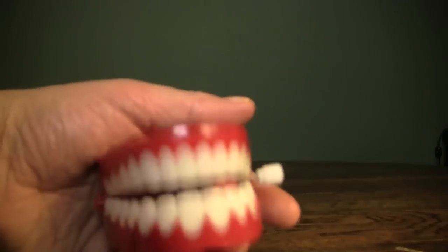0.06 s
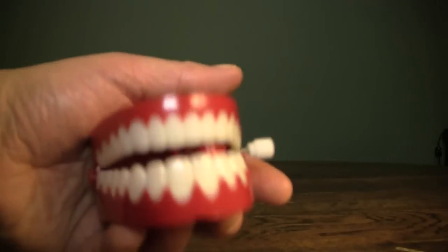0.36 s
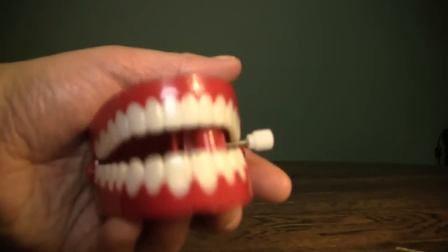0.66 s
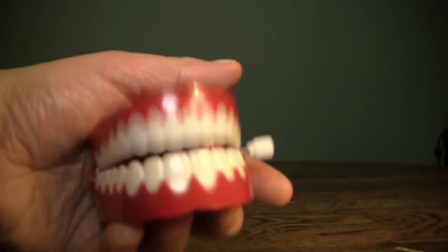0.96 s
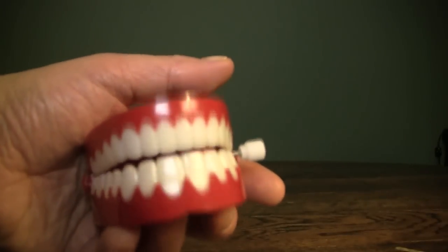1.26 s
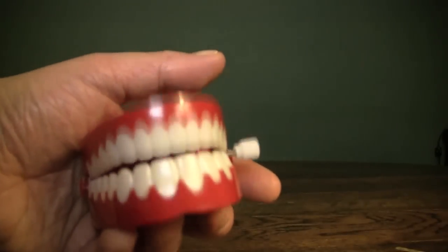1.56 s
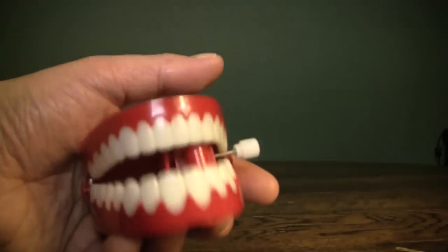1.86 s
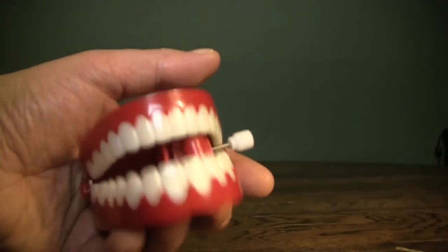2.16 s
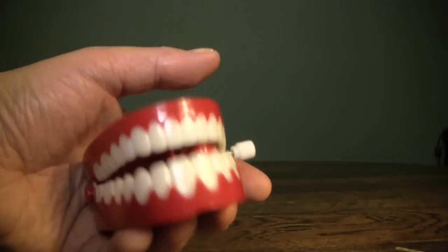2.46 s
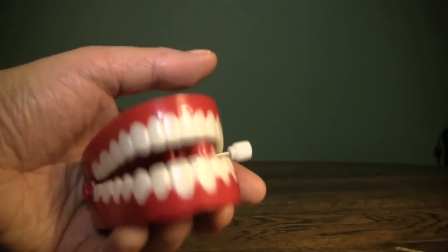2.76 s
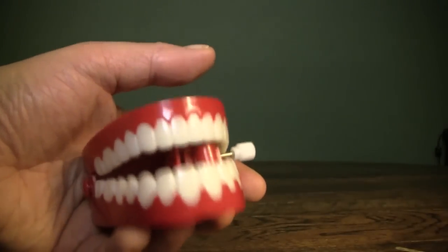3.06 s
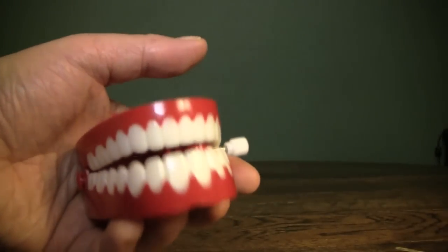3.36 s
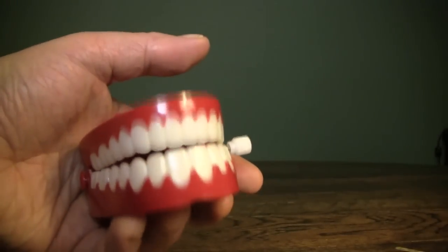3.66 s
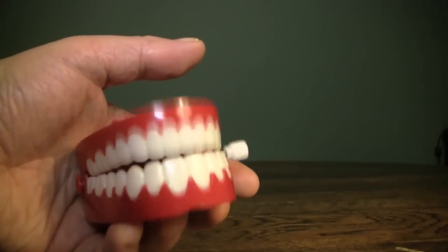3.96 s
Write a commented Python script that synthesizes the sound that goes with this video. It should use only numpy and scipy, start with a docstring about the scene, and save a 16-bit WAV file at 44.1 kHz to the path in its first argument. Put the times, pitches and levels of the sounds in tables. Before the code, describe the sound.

A wind-up teeth toy clicks and clacks rapidly in a hand, heard up close in a quiet room. Soft thuds under the bites fade midway, and the chatter slows as the spring runs down to a final clack.

```python
"""Wind-up plastic teeth chatter in a hand, close by in a quiet room.
From the start, about 21 times a second, a cam clicks the jaw open and the jaw clacks shut.
A finger resting on the upper jaw adds a thud and changes its ring; near 2 s it lifts.
After 3 s the spring runs down: the bites slow, and one late last bite falls at 3.9 s."""
import sys
import numpy as np
from scipy import signal
from scipy.fft import rfft, irfft
from scipy.io import wavfile
from scipy.ndimage import uniform_filter1d

SR = 44100
rng = np.random.default_rng(int(sys.argv[2]) if len(sys.argv) > 2 else 0)


def wav_record(signal):
    """Record a signal, one row per channel, as 16-bit PCM in the file named by sys.argv[1]."""
    frames = np.transpose(np.atleast_2d(signal))
    bounded = np.clip(frames, -1, 1)
    # unit amplitude maps onto the largest positive 16-bit level
    quanta = np.round(bounded * 32767).astype(np.int16)
    wavfile.write(sys.argv[1], SR, quanta)


N = 176400

# Room tone spectrum: (frequency [Hz], relative density [dB])
ROOM_TONE = [(20, -13), (60, -10.5), (170, -4), (400, -6), (1000, -10), (4000, -13), (10000, -18.5),
             (16000, -38)]
# Room tail decay: (frequency [Hz], t60 [s])
ROOM_T60 = [(200, 1.5), (1500, 0.5764), (4000, 0.3248), (8000, 0.48), (15000, 0.3)]
# Reflection spectrum: (frequency [Hz], level [dB])
ROOM_COLOUR = [(100, -15.5), (400, -20), (1000, -14), (1500, -13.8), (2200, -9.8), (3000, -11.3),
               (4000, -13.2), (8000, -15), (15000, -19.5)]
# Bites: (open time [s], click level [dB], shut time [s], clack level [dB], thud level [dB])
BITES = [(0.0159, -0.4, 0.0337, 0.16, -5), (0.0588, -0.06, 0.0768, 0.15, -3),
         (0.1032, -0.03, 0.1214, -0.6, -7.5), (0.1517, 1.65, 0.1698, 0.5, -4.5),
         (0.1992, 0.7, 0.2174, 0.4, -3), (0.2448, 0.5, 0.2631, 0.26, -2.5), (0.2907, 1.5, 0.3088, 0.4, -1),
         (0.3352, 1.8, 0.354, 0.45, -1), (0.3819, 0.62, 0.401, 1, -4.5), (0.4284, 0.1, 0.4473, -0.55, -4),
         (0.4754, 1, 0.4936, -0.0, -3.5), (0.5205, -0.5, 0.5394, 0.4, -2.5), (0.5673, 0.5, 0.5861, 0.5, -7),
         (0.617, -0.52, 0.636, 0.1, -8.5), (0.6654, -0.6, 0.6839, 0.91, -5.5),
         (0.712, -0.28, 0.7304, 0.3, -1), (0.7585, -1.4, 0.7773, 0.1, -2), (0.8073, 0, 0.8262, -1, -4),
         (0.8556, -0.62, 0.8745, -0.9, -8.5), (0.9029, -0.15, 0.9216, 0.85, -5),
         (0.9492, 0, 0.9675, 0.54, -4), (0.997, 0.58, 1.0165, -0.5, -2), (1.047, 0.12, 1.0657, 0.0, -3),
         (1.0955, -0.17, 1.1134, 1.0, -2.5), (1.1428, -1.35, 1.1615, 0.66, -4.5),
         (1.1895, -0.66, 1.2084, 0.5, -1.5), (1.2426, -1.43, 1.2618, -0.86, -0.5),
         (1.2924, -1.5, 1.3116, -1.5, 1), (1.3422, -0.13, 1.3605, -0.0, -2.5),
         (1.3894, -1, 1.4089, -2.5, -8.5), (1.4403, 0.17, 1.4601, -0.93, -3),
         (1.4932, -1, 1.5127, -0.6, -1), (1.5446, -1.5, 1.5641, 0.05, -4),
         (1.5939, -0.5, 1.6136, -0.13, -0.5), (1.6442, -1, 1.6638, -0.2, 1.5),
         (1.6972, -1.23, 1.7172, -1.13, -3.5), (1.7511, -1, 1.7703, -0.48, -1.5),
         (1.8028, -1.67, 1.8223, 0, -0.5), (1.8517, -0.83, 1.8723, -1.34, -6),
         (1.906, -1.37, 1.9261, -0.79, -11), (1.9605, -0.5, 1.9805, -0.85, -18),
         (2.0132, -0.07, 2.0332, -1.0, -15), (2.0635, 0.68, 2.0835, -0.54, -8),
         (2.1126, -0.43, 2.1326, -0.5, -8), (2.1633, 0.25, 2.1838, -0.83, -6),
         (2.2126, 1.3, 2.233, -1.1, -8), (2.2596, 2.8, 2.2799, -1.13, -11),
         (2.3048, 2.48, 2.3249, 0.07, -12.5), (2.3516, 2, 2.3721, -0.13, -17),
         (2.3989, 1, 2.4192, 0.5, -11), (2.445, 2.32, 2.4648, -0.24, -8.5),
         (2.4889, -0.27, 2.5091, 0.5, -12.5), (2.532, 0.1, 2.5528, -0.08, -14.5),
         (2.579, 0, 2.6001, -0.6, -17.5), (2.6257, 0.2, 2.6466, 0.5, -18),
         (2.6705, 0.0, 2.6908, 0.42, -14.5), (2.7143, -0.53, 2.7353, -0.19, -15),
         (2.7606, 0.32, 2.7819, -0.5, -16.5), (2.8094, 0.74, 2.8305, 0.1, -19),
         (2.8566, -0.5, 2.8777, 0.5, -17.5), (2.9043, 0.76, 2.9252, 1, -14),
         (2.9523, 1.68, 2.9736, 0.5, -15), (3.0049, 1.9, 3.0265, -0.43, -18),
         (3.0571, 1.52, 3.0779, -0.0, -12.5), (3.1093, 1.08, 3.1303, 0.76, -17.5),
         (3.1602, 1.66, 3.1814, -0.95, -16), (3.2147, 2.94, 3.2364, -0.6, -17),
         (3.272, 2.35, 3.2941, -0.68, -15), (3.3272, 0.5, 3.3487, 1, -16), (3.3795, 1, 3.4009, 1.17, -16),
         (3.4324, 0.47, 3.4543, 0.78, -16.5), (3.489, 1.8, 3.5113, 0.17, -17),
         (3.5502, 1.24, 3.5723, 1, -17), (3.613, 2.2, 3.6344, 1.59, -14.5),
         (3.6709, 1.5, 3.6927, 1.36, -17.5), (3.7405, 1.6, 3.7651, -1.5, -19.5),
         (3.9086, 4, 3.9308, 0.79, -21)]
# Clockwork resonances: (frequency [Hz], width [Hz], height [dB])
CAM_MODES = [(1291, 144, 7.5), (1475, 226, 11.5), (2241.6, 121, 9), (3120, 154, 4.5), (3684, 728, 17),
             (4552, 344, 13), (5835, 610, 9), (7380, 360, 3), (9175, 360, 6.5), (10627, 1938, 13.5),
             (11540, 766, 12.5), (13950, 2680, 18.5)]
# Broad click spectrum: (frequency [Hz], level [dB])
CAM_COLOUR = [(30, -28.5), (100, -26), (250, -15), (600, -1), (1000, -3.5), (2550, -0.5), (5200, -4),
              (8500, -2.5), (12500, -13.5), (15500, -16.5)]
# Jaw resonances: (held frequency [Hz], free frequency [Hz], width [Hz], held height [dB],
# free height [dB])
JAW_MODES = [(1299, 1259, 213.2, 4.5, 12), (1509.5, 1526.5, 242.5, 15.5, 18),
             (1766, 1758.7, 274.5, 13, 15.5), (2123, 2191, 329.3, 13.5, 16), (2796, 2911, 397.6, 21, 15.5),
             (3136, 3350, 513, 6, 10.5), (3644.4, 3680, 330, 19, 8), (4384, 4313, 485, 10, 12),
             (5982, 6205, 292, 8.5, 8.5), (6810, 7016, 446, 3.5, 5), (7844, 7950, 1130, 7, 6.5),
             (9843, 9738, 738, 7.5, 8.5), (10900, 11320, 1840, 6.5, 8)]
# Broad clack spectrum: (frequency [Hz], level [dB])
JAW_COLOUR = [(30, -25), (80, -20), (140, -11.5), (250, -4.5), (400, 1), (700, 5), (900, 3), (1100, 5),
              (2550, -5.5), (5200, 6.5), (8500, 2.5), (12500, -2), (15500, -6)]
# Finger on the jaw: (time [s], lift [0 held, 1 free])
FINGER_LIFT = [(0, 0.393), (.4, 0.11), (1.2, 0), (1.8, 0.117), (2.05, 0.753), (2.4, 0.84), (3.0, 1),
               (4, 0.62)]
# Grip detuning of the low jaw modes: (time [s], frequency factor [ratio])
GRIP_DETUNE = [(0, 0.9902), (1.8, 1.0133), (2.08, 0.975), (2.3, 1.047), (2.7, 0.993), (3.1, 0.9934),
               (3.65, 0.971), (3.93, 0.933)]
# Diffuse sound at the microphone pair: (frequency [Hz], coherence [0..1])
MIC_COHERENCE = [(30, .45), (250, .6), (600, .75), (1500, 0.9964), (3500, 0.9626), (7000, 0.855),
                 (12000, 0.163)]
# Port imbalance: (frequency [Hz], left minus right [dB])
MIC_BALANCE = [(60, 2.5), (200, -4), (600, -1.59), (1500, 0), (6400, -0.08), (9800, -1.5), (12000, 0),
               (15000, 3.5)]
# Port phase: (frequency [Hz], left lead [rad])
MIC_PHASE = [(30, 0.33), (340, 0.173), (2500, 0), (6000, 0), (9300, 0.044), (10400, 0.74), (12100, 1.14),
             (14000, 0.71), (16000, 0.65)]

CAM_BURST = dict(crack_t60_s=.013, rattle_db=-12, rattle_t60_s=.02)
JAW_BURST = dict(crack_t60_s=.0154, rattle_db=-10.5, rattle_t60_s=.0307)
GRIP_BELOW_HZ, THUD_BELOW_HZ, THUD_REF_DB = 2300, 556, -13.5
KNOCK_HZ, KNOCK_WIDTH_HZ, KNOCK_DB = 1130, 170, 2.5
DRIFT_DB, DRIFT_STEP_S, DRIFT_ABOVE_HZ = 2.4, .4, 2500
SLIP_S, RISE_S, JITTER_S = .0014, .0003, .00006
HIT_SAMPLES, LEAD_SAMPLES = 4096, 256
HIT_HZ, HIT_S = np.fft.rfftfreq(HIT_SAMPLES, 1 / SR), (np.arange(HIT_SAMPLES) - LEAD_SAMPLES) / SR


def amp(db):
    """Decibels to gain."""
    return 10 ** (np.asarray(db) / 20)


def unit(x):
    """Scale to energy 1."""
    return x / np.sqrt(np.sum(x ** 2) + 1e-20)


def lookup(table, hz):
    """Interpolate on a log-frequency axis."""
    table_hz, value = np.transpose(table)
    return np.interp(np.log(hz + 1), np.log(table_hz + 1), value)


def diffuse(spectra, hz, side_db=0):
    """Two independent spectra to a partly coherent left-right pair."""
    coherence = lookup(MIC_COHERENCE, hz)
    mid = spectra[0] * np.sqrt((1 + coherence) / 2)
    side = spectra[1] * np.sqrt((1 - coherence) / 2) * amp(side_db)
    return np.array([mid + side, mid - side])


def room_tone(rms_db=-58.5):
    """Faint steady diffuse noise."""
    hz = np.fft.rfftfreq(N, 1 / SR)
    spectra = diffuse(rfft(rng.standard_normal((2, N))), hz) * amp(lookup(ROOM_TONE, hz))
    return amp(rms_db) * unit(irfft(spectra, N)) * np.sqrt(2 * N)


def reflections(toy, early_db=-1.5, early_t60_s=.132, gap_s=.00219):
    """Early reflections from table and walls, then a short tail."""
    hz, t, noise = signal.stft(rng.standard_normal((2, SR // 2)), SR, nperseg=256)
    hz = hz[:, None]
    decay = amp(-60 * t / lookup(ROOM_T60, hz)) + amp(early_db - 60 * t / early_t60_s)
    decay = decay / np.sqrt((decay ** 2).mean(1, keepdims=True)) * amp(lookup(ROOM_COLOUR, hz))
    tail = signal.istft(diffuse(noise * decay, hz), SR, nperseg=256)[1]
    onset = np.clip(np.arange(tail.shape[1]) / SR / gap_s - 1, 0, 1)
    tail = tail * onset / np.sqrt(tail.shape[1])
    return signal.fftconvolve(toy.mean(0)[None], tail, axes=1)[:, :N]


def lingering_ring(toy, centre_hz=2225, spread_hz=85, t60_s=.42, level_db=-30):
    """Ten close tones ring on between hits."""
    t = np.arange(SR // 2) / SR
    tones_hz = centre_hz + spread_hz * np.linspace(-1, 1, 10)
    tones = sum(np.sin(2 * np.pi * (hz * t + rng.random())) for hz in tones_hz)
    ring = amp(level_db) * unit(tones * amp(-60 * t / t60_s))
    return signal.fftconvolve(toy.mean(0), ring)[:N]


def minimum_phase(gain_db):
    """Spectrum of the promptest response with this gain."""
    log_gain = np.log(amp(np.r_[gain_db, gain_db[-2:0:-1]]))
    return np.exp(np.conj(signal.hilbert(log_gain)))[:len(gain_db)]


def resonances_db(hz, width_hz, height_db, scatter_db=.63):
    """Resonance peaks, struck a little differently each time."""
    height_db = height_db + scatter_db * rng.standard_normal(len(hz))
    return (height_db / (1 + (2 * (HIT_HZ[:, None] - hz) / width_hz) ** 2)).sum(1)


def burst(crack_t60_s, rattle_db, rattle_t60_s, flatten_passes=0):
    """Contact spectrum: a dense crack plus a weaker, longer rattle."""
    crack = amp(-60 * abs(HIT_S) / crack_t60_s)
    rattle = amp(rattle_db - 60 * abs(HIT_S) / rattle_t60_s)
    envelope = np.clip(HIT_S / RISE_S, 0, 1) * np.hypot(crack, rattle)
    noise = rng.standard_normal((2, HIT_SAMPLES)) * envelope
    for _ in range(flatten_passes):
        spectra = rfft(noise)
        white = irfft(spectra / (abs(spectra) + 1e-9))
        local_rms = np.sqrt(abs(uniform_filter1d(white ** 2, size=31)) + 1e-20)
        noise = envelope * np.tanh(.5 * white / local_rms)
    return diffuse(rfft([unit(noise[0]), unit(noise[1])]), HIT_HZ, side_db=-4)


def impact(body_db, repeated, fresh, fresh_share, slip_db, gain_db):
    """A brief slip, then nearly the same burst each time, filtered by the plastic body."""
    contact = np.sqrt(1 - fresh_share) * repeated + np.sqrt(fresh_share) * fresh
    swell = (HIT_S < 0) * np.exp(-abs(HIT_S) / SLIP_S)
    slip = rfft(unit(rng.standard_normal(HIT_SAMPLES) * swell))
    return irfft((contact + amp(slip_db) * slip) * minimum_phase(body_db + gain_db))


def add_hit(mix, time_s, hit):
    """Mix in a hit with its contact at time_s, plus jitter."""
    start = round((time_s + HIT_S[0] + rng.normal(0, JITTER_S)) * SR)
    span = mix[:, max(start, 0):start + hit.shape[1]]
    span += hit[:, max(-start, 0):][:, :span.shape[1]]


def cam_clicks():
    """The cam clicks as it lifts the jaw."""
    out, repeated = np.zeros((2, N)), burst(**CAM_BURST, flatten_passes=14)
    for open_s, click_db, *_ in BITES:
        body_db = lookup(CAM_COLOUR, HIT_HZ) + resonances_db(*np.transpose(CAM_MODES)) + click_db
        click = impact(body_db, repeated, burst(**CAM_BURST), fresh_share=.3, slip_db=-20, gain_db=.2)
        add_hit(out, open_s, click)
    return out


def hand_ripples_db():
    """Fine random treble colour, one row per pose of the hand."""
    noise = rng.standard_normal((40, len(HIT_HZ)))
    ripple = uniform_filter1d(uniform_filter1d(noise, size=24), size=24)
    return DRIFT_DB * ripple / ripple.std() * HIT_HZ ** 2 / (HIT_HZ ** 2 + DRIFT_ABOVE_HZ ** 2)


def jaw_ring_db(time_s, ripples_db):
    """Finger and grip shift the jaw modes; the opening hand adds a low knock."""
    held_hz, free_hz, width_hz, held_db, free_db = np.transpose(JAW_MODES)
    lift = np.interp(time_s, *np.transpose(FINGER_LIFT))
    detune = np.interp(time_s, *np.transpose(GRIP_DETUNE))
    hz = held_hz + lift * (free_hz - held_hz)
    hz *= np.where(hz < GRIP_BELOW_HZ, detune, 1)
    modes_db = resonances_db(hz, width_hz, held_db + lift * (free_db - held_db))
    knock_db = resonances_db([KNOCK_HZ], KNOCK_WIDTH_HZ, lift * KNOCK_DB)
    pose_weights = unit(np.exp(-(np.arange(len(ripples_db)) - time_s / DRIFT_STEP_S) ** 2))
    return modes_db + knock_db + pose_weights @ ripples_db


def jaw_clacks():
    """The teeth clack shut and thud into the hand."""
    out, repeated = np.zeros((2, N)), burst(**JAW_BURST, flatten_passes=14)
    ripples_db = hand_ripples_db()
    for _, _, shut_s, clack_db, thud_db in BITES:
        shelf_db = (thud_db - THUD_REF_DB) / (1 + (HIT_HZ / THUD_BELOW_HZ) ** 2)
        body_db = lookup(JAW_COLOUR, HIT_HZ) + jaw_ring_db(shut_s, ripples_db) + shelf_db + clack_db
        fresh = burst(**JAW_BURST)
        clack = impact(body_db, repeated, fresh, fresh_share=.0778, slip_db=-19, gain_db=.5863)
        add_hit(out, shut_s, clack)
    return out


def scene():
    """The toy in its room."""
    toy = cam_clicks() + jaw_clacks()
    return toy + reflections(toy) + lingering_ring(toy) + room_tone()


def record(dry, cutoff_hz=16200):
    """Two microphone ports, unequal in level and phase, then a low-pass."""
    hz, side = np.fft.rfftfreq(2 * N, 1 / SR), np.array([[.5], [-.5]])
    ports = amp(side * lookup(MIC_BALANCE, hz)) * np.exp(1j * side * lookup(MIC_PHASE, hz))
    heard = irfft(rfft(dry, 2 * N) * ports)[:, :N]
    lowpass = signal.firwin(255, cutoff_hz, window=("kaiser", 9), fs=SR)
    return signal.oaconvolve(heard, lowpass[None], "same")


dry = scene()
out = record(dry)
wav_record(out)
```